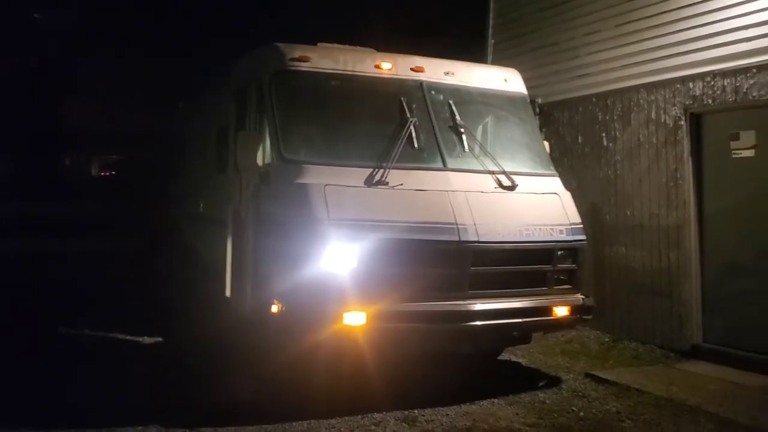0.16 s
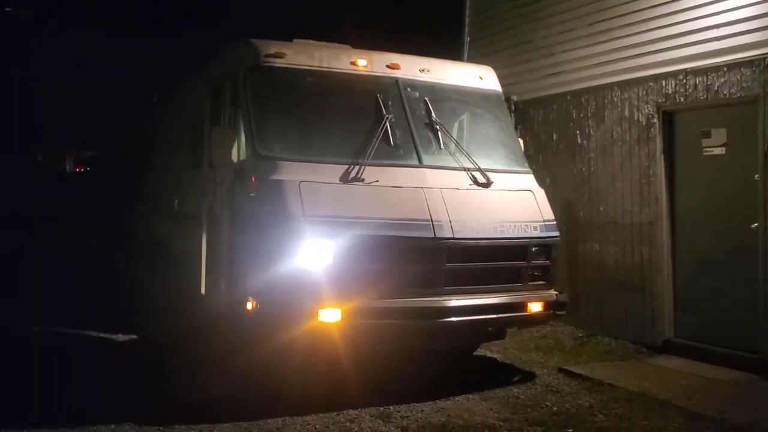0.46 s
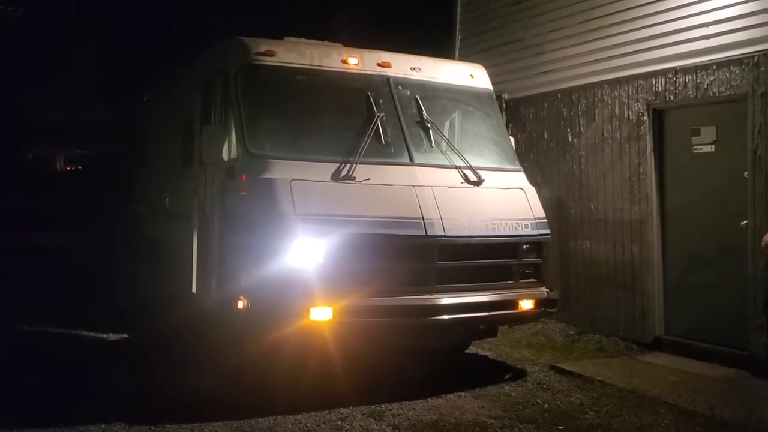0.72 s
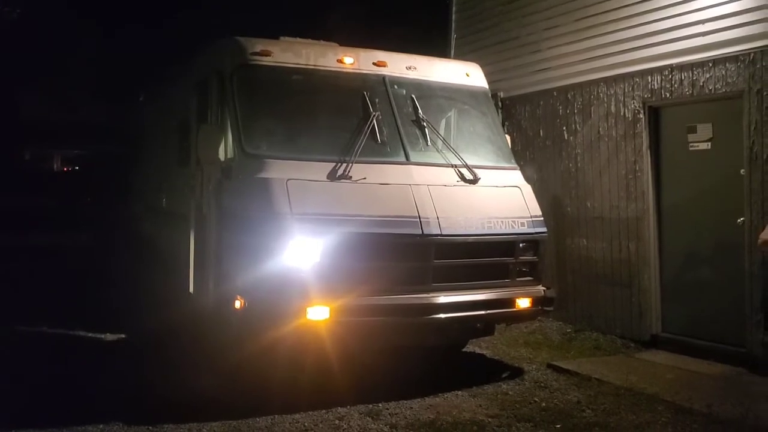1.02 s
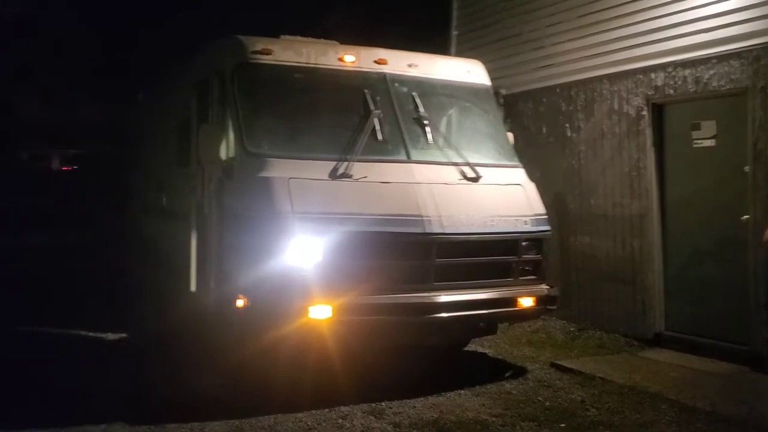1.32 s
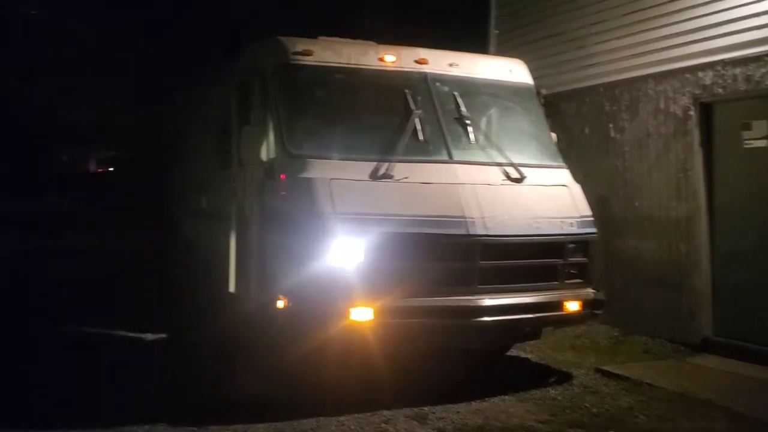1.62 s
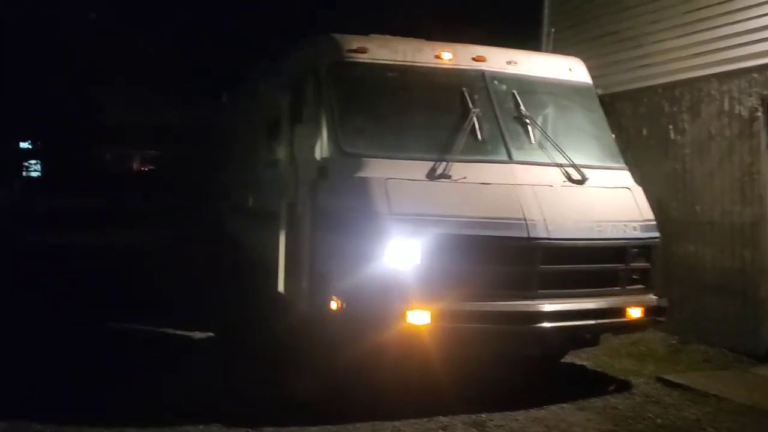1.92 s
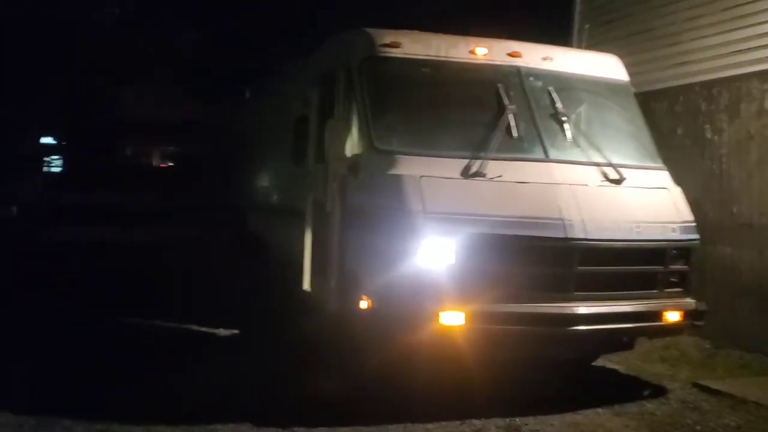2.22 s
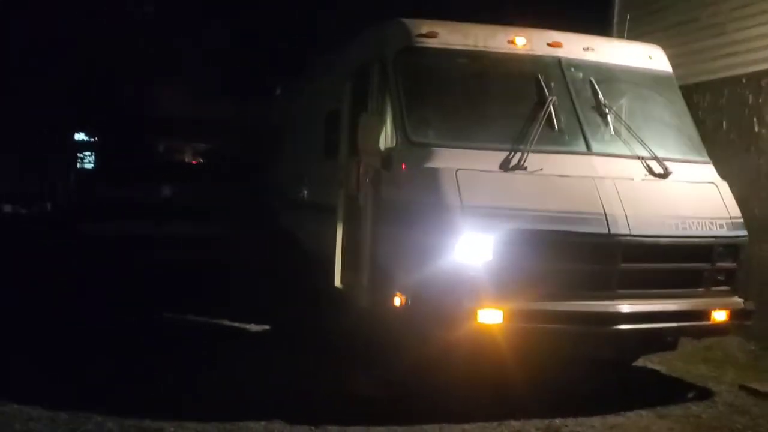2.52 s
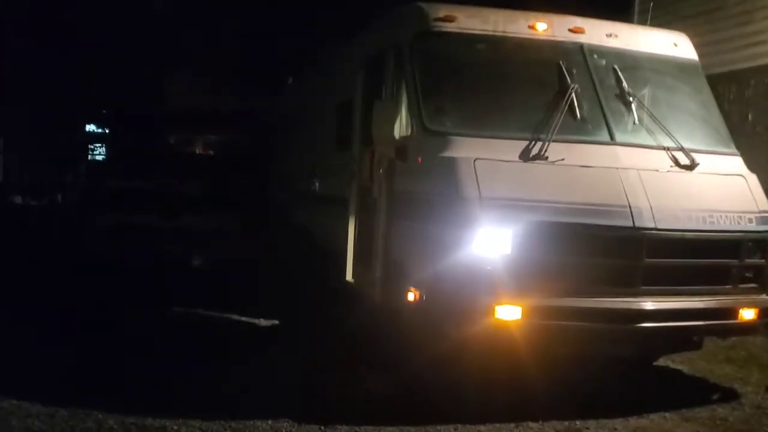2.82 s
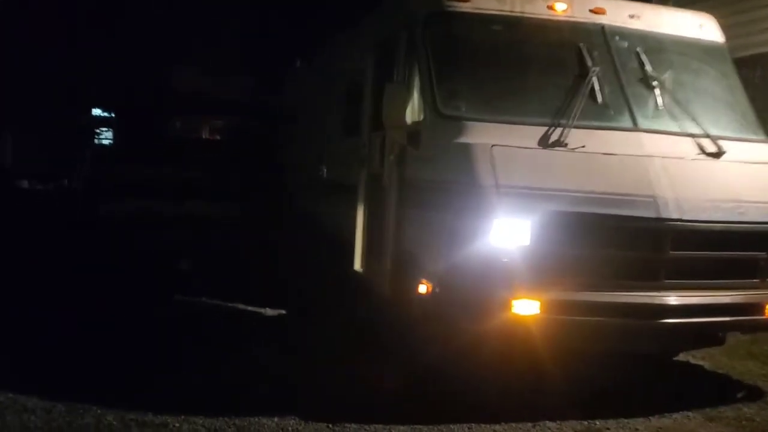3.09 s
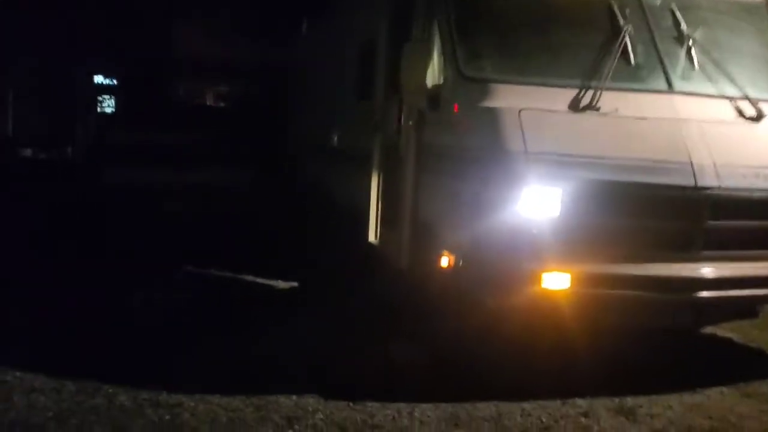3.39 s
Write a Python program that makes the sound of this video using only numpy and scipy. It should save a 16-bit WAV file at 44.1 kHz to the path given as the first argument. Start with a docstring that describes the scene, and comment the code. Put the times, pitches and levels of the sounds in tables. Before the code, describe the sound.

A motorhome engine idles fast with a deep steady boom, ticking valves and whirring fan.

```python
"""A motorhome's V8 runs at a fast idle beside a wall at night while the listener walks closer.
From the start the exhaust booms at the firing rate, the cylinders thump unevenly, and valve gear ticks and
clacks over the whirr of fan and belts, made of filtered noise; faint sine chinks come from loose metal.
A noise burst of grit clicks after a second and clearer rattles follow. Past two seconds grit scrapes, a stone
knocks three times as fading sines and the belt whistle grows; near the end grit clicks again."""
import sys
import numpy as np
from scipy import signal
from scipy.fft import rfft, irfft
from scipy.io import wavfile
from scipy.ndimage import uniform_filter1d, map_coordinates

SR = 44100
rng = np.random.default_rng(int(sys.argv[2]) if len(sys.argv) > 2 else 0)


def wav_record(signal):
    """Record a signal, one row per channel, as 16-bit PCM in the file named by sys.argv[1]."""
    frames = np.transpose(np.atleast_2d(signal))
    bounded = np.clip(frames, -1, 1)
    # unit amplitude maps onto the largest positive 16-bit level
    quanta = np.round(bounded * 32767).astype(np.int16)
    wavfile.write(sys.argv[1], SR, quanta)


N = 156555  # length in samples
T, HZ = np.arange(N) / SR, np.fft.rfftfreq(N, 1 / SR)


def amp(db):
    """Turns decibels into a plain gain."""
    return 10 ** (np.asarray(db) / 20)


def unit(x):
    """Scales to an average (rms) strength of 1."""
    return x / np.sqrt(np.mean(x ** 2) + 1e-20)


def curve(table, order=1):
    """Reads one column of a time table at every sample."""
    rows = np.array(table)
    return np.interp(T, rows[:, 0], rows[:, order])


def read(table, order=1):
    """Reads one column of a frequency table at every frequency of the spectrum."""
    rows = np.array(table)
    return np.interp(np.log(HZ + 1), np.log(rows[:, 0]), rows[:, order])


def peaks(modes):
    """Gain of a set of resonances: each lets through a band around its own pitch."""
    power = 0
    for hz, width, db in modes:
        detuning = (HZ ** 2 - hz ** 2) / (width * (HZ + 1))
        power = power + amp(db) ** 2 / (1 + detuning ** 2)
    return np.sqrt(power)


def colour(x, gain):
    """Filters with the given gain; nothing sounds before its cause (minimum phase)."""
    log_gain = np.log(np.maximum(gain, 1e-5))
    # folding the cepstrum onto positive times makes the filter causal
    cepstrum = irfft(log_gain, N) * (1 + np.sign(N / 2 - np.arange(N)))
    cepstrum[0] /= 2
    return irfft(rfft(x) * np.exp(rfft(cepstrum)), N)


def drift(hz):
    """Slow random wander of rms 1, with little movement faster than the given rate."""
    return unit(irfft(rfft(rng.standard_normal(N)) * np.exp(-(HZ / hz) ** 2), N))


# How alike left and right are. Each row: pitch in Hz, likeness from 0 to 1.
LIKENESS = [(60, 0.85), (120, 1), (240, 0.98), (480, 0.88), (950, 0.94), (1900, 0.5), (3800, 0.02),
            (16000, 0)]


def noise_pair():
    """White noise for left and right, alike in the bass and unrelated in the treble."""
    a, b = rfft(rng.standard_normal((2, N)))
    same = np.clip(read(LIKENESS), -1, 1)
    return irfft(np.array([a, same * a + np.sqrt(1 - same ** 2) * b]), N)


def burst(start, rise, decay):
    """Loudness shape with a straight rise and an exponential fall."""
    attack = np.clip((T - start) / rise, 0, 1)
    return attack * np.exp(-np.maximum(T - start - rise, 0) / decay)


def strikes(cycle, place, scatter_db, jitter_s):
    """One impulse in each engine cycle, a little uneven in time and strength."""
    turns = np.arange(np.ceil(cycle[-1])) + place
    turns = turns[turns < cycle[-1]]
    late, strong = rng.standard_normal((2, len(turns)))
    seconds = np.interp(turns, cycle, T) + jitter_s * late
    at = np.clip(seconds * SR, 0, N - 1).astype(int)
    return np.bincount(at, amp(scatter_db * strong), N)


# The idle. Each row: time in seconds, crank speed in rpm, level of the exhaust note in dB.
IDLE = [(0.0, 1061.6, -19.4), (0.3, 1035.6, -18.3), (0.7, 1020.6, -16.3), (1.1, 1068.6, -19.2),
        (1.45, 1056.2, -19.0), (1.85, 1042.6, -18.7), (2.15, 1032.2, -17.9), (2.4, 1039.6, -18.0),
        (2.65, 1067.6, -18.8), (3.0, 1056.8, -17.3), (3.3, 1032.6, -18.9), (3.55, 1029.0, -19.2)]
# Tones of the exhaust, as multiples of the engine cycle rate (8 is the firing rate).
EXHAUST_MULTIPLES = [5, 7, 8, 9, 11, 13, 16]
# One row for each multiple: level in dB relative to the exhaust note, waver as a share of the tone.
EXHAUST_TONES = [(-22.5, 0.67), (-36, 1), (0.06, 0.073), (-21.5, 0.49), (-13.5, 0.21), (-15, 0.24),
                 (-19.5, 0.22)]
# Firing slots of one cylinder bank, counted in eighths of a cycle.
BANK_SLOTS = [1, 3, 4, 6]
PIPE_LAG = .667  # in cycles


def exhaust(cycle):
    """The firing note, with side tones from the uneven firing slots of one cylinder bank."""
    out = np.zeros(N)
    for k, (db, waver) in zip(EXHAUST_MULTIPLES, EXHAUST_TONES):
        # the slots set where in the cycle each tone peaks
        bank = sum(np.exp(-2j * np.pi * k * slot / 8) for slot in BANK_SLOTS)
        tone = np.exp(1j * (2 * np.pi * k * (cycle - PIPE_LAG) + np.angle(bank)))
        wander = drift(hz=9) + 1j * drift(hz=4)
        out += amp(db) * (tone * (1 + waver * wander)).real
    return out * amp(curve(IDLE, order=2))


# Relative level of each cylinder's thump in dB.
THUMPS = [-1.8, -7.9, -3.7, -7.9, -8, -3.9, -8.4, -10.5]
# Place of each thump in the cycle, from 0 to 1.
THUMP_PLACES = [.984, .077, .226, .35, .494, .607, .732, .846]
# Sound of the hollow underbody. Each row: pitch in Hz, gain in dB.
UNDERBODY = [(40, -34.5), (138, -28.5), (168, -7), (195, 0), (225, .5), (255, -12), (310, -11.5),
             (400, -15.5), (520, -27.5), (800, -21.5), (1000, -37), (3000, -60)]
# Sound of the gas puffs. Each row: pitch in Hz, gain in dB.
PUFF = [(500, -28), (1200, -18), (2500, 6.5), (4000, 13.5), (6500, -12), (8500, -29), (16000, -29)]
THUMP_DB, THUMP_SCATTER_DB, THUMP_JITTER_S = -37.3, .8, .00012
PUFF_DB, PUFF_RISE_S, PUFF_DECAY_S = -53, 0.0037, 0.0046


def thumps(cycle):
    """Eight cylinders of unequal strength knock the hollow underbody and each let out a puff of gas."""
    blows = np.zeros(N)
    for place, db in zip(THUMP_PLACES, THUMPS):
        blows += amp(db) * strikes(cycle, place, THUMP_SCATTER_DB, THUMP_JITTER_S)
    body = unit(colour(blows, amp(read(UNDERBODY))))
    gate = signal.fftconvolve(blows, burst(0, PUFF_RISE_S, PUFF_DECAY_S))[:N]
    puffs = unit(colour(noise_pair() * gate, amp(read(PUFF))))
    return amp(THUMP_DB) * body + amp(PUFF_DB) * puffs


# Regular ticks. Each row: level in dB before the ringing, rise in seconds, decay in seconds.
TICKS = [(-48.5, 0.0057, 0.0056), (-52.5, .0025, .005), (-47.5, 0.0026, .004)]
# Place of each tick in the cycle, from 0 to 1.
TICK_PLACES = [.222, .848, .912]
# Ringing of the valve gear. Each row: pitch in Hz, width in Hz, gain in dB.
VALVE_MODES = [(3065, 56, 17), (4240, 300, 10), (5720, 360, 7.5), (6810, 180, 8.5), (7970, 120, 5),
               (8900, 130, 4.5), (9660, 200, 1), (10220, 320, 4.5), (11600, 160, 2), (12570, 220, 4),
               (13700, 250, 0), (15550, 500, 4.5)]
# Harder lifter clacks. Each row: start in seconds, level in dB before the ringing,
# pitch in Hz around which the ringing is driven hardest.
CLACKS = [(0.14, -41, 6870), (0.2547, -41, 6860), (0.4882, -46, 6600), (0.606, -38, 6720),
          (0.6837, -40, 6720), (0.7232, -36, 6870), (0.838, -38.5, 6600), (0.9526, -49, 6830),
          (1.029, -44, 10100), (1.2944, -51, 6890), (1.5168, -37.5, 15700), (1.6331, -39, 6900),
          (1.7473, -36, 6630), (1.941, -40, 10300), (2.2098, -39, 6880), (2.327, -36, 6860),
          (2.4058, -38, 12500), (2.4403, -40, 6760), (2.8927, -35, 6770), (3.0071, -35.5, 6760),
          (3.2379, -35, 6790), (3.3542, -37, 6960)]
TICK_SCATTER_DB, TICK_JITTER_S, TICK_TAIL_DB, TICK_TAIL_S = 4, .0004, -6.5, 0.022
CLACK_RISE_S, CLACK_DECAY_S, CLACK_FOCUS_HZ, CLACK_OTHERS_DB = 0.0023, 0.0068, 500, -5.5
RING_VARY_DB = 3.5


def tick_shape(rise, decay):
    """Loudness shape of a tick with its longer, weaker tail from the engine bay."""
    tail = amp(TICK_TAIL_DB) * burst(0, rise, TICK_TAIL_S)
    return np.hypot(burst(0, rise, decay), tail)[:SR // 4]


def valves(cycle):
    """Rasping ticks ring the valve gear in changing blends of modes; now and then a lifter clacks harder."""
    gate = np.zeros(N)
    for place, (db, rise, decay) in zip(TICK_PLACES, TICKS):
        hits = strikes(cycle, place, TICK_SCATTER_DB, TICK_JITTER_S)
        gate += amp(db) * signal.oaconvolve(hits, tick_shape(rise, decay))[:N]
    start, clack_db, clack_hz = np.transpose(CLACKS)
    clack_at = (start * SR).astype(int)
    clack = tick_shape(CLACK_RISE_S, CLACK_DECAY_S)
    out = np.zeros((2, N))
    for hz, width, db in VALVE_MODES:
        # modes far from a clack's own pitch get less of it
        apart = 1 - np.exp(-((hz - clack_hz) / CLACK_FOCUS_HZ) ** 2)
        hits = np.bincount(clack_at, amp(clack_db + CLACK_OTHERS_DB * apart), N)
        hard = signal.oaconvolve(hits, clack)[:N]
        ring = irfft(rfft(rng.standard_normal((2, N))) * peaks([(hz, width, db)]), N)
        out += ring * np.hypot(gate * amp(RING_VARY_DB * drift(hz=6.3)), hard)
    return out


# Fan, belts and block from afar. Each row: pitch in Hz, relative level in dB per Hz.
WHIRR_FAR = [(20, -14), (40, -20), (70, 11), (120, 5.5), (200, 8), (290, 2.5), (380, 4.5), (500, -10),
             (620, 1.5), (720, 0.5), (830, 3.5), (970, -8), (1150, -7), (1550, -4), (2000, -7),
             (2380, -3.5), (2750, -12), (3800, -14.5), (4800, -13), (6700, -15), (8200, -29), (12000, -29),
             (16000, -28)]
# The same from nearer. Each row: pitch in Hz, relative level in dB per Hz.
WHIRR_NEAR = [(20, -5), (40, 0), (70, 14), (120, 12), (200, 9), (290, 6), (400, -3.5), (480, -3.5),
              (620, 3), (820, 0.5), (990, -6), (1150, -8), (1400, -5), (2250, -4.5), (2700, -6),
              (3800, -12), (4500, -17), (5200, -23), (6700, -22), (8200, -23), (12000, -29.5), (16000, -32)]
# The walk. Each row: time in seconds, nearness from 0 to 1, level of the whirr in dB.
APPROACH = [(0, 0.22, -35), (1.1, 0.13, -33.5), (1.8, 0.44, -32.5), (2.4, 0.8, -31.5), (3.0, 0.96, -30.5),
            (3.55, 0.68, -31)]
# Balance. Each row: pitch in Hz, left minus right in dB from afar, the same from nearer.
TILT = [(99, 3.5, 0), (400, -2.5, 1), (595, 0.5, -3.5), (955, -2.5, 3.5), (1770, 0.5, -3), (2410, 0.5, 4),
        (3200, 13, -2.5), (4140, 8.5, 1.5), (5470, -2, 4.5), (7500, -1, -5.5), (9300, 6, -4),
        (15000, -4, -5)]
# Belt whistle. Each row: time in seconds, level in dB.
BELT = [(0, -55), (.8, -75), (2, -51), (2.4, -55), (2.6, -45.5), (3.05, -45), (3.5, -53)]
BELT_HZ, BELT_WIDTH_HZ = 2405, 60
THROB, PATCHY_DB = 0.035, 1.27  # throb is a share of the whirr


def whirr(cycle):
    """Fan and block noise throbs with the firings and fills out on approach, with a thin belt whistle."""
    near = np.clip(curve(APPROACH), 0, 1)
    # small patches of time and pitch flicker in level
    z = signal.stft(noise_pair(), nperseg=512)[2]
    patches = uniform_filter1d(rng.standard_normal(z.shape[1:]), size=7, axis=0)
    patches = unit(uniform_filter1d(patches, size=5, axis=1))
    air = signal.istft(z * amp(PATCHY_DB * patches), nperseg=512)[1][:, :N]
    air = air * (1 + THROB * np.cos(2 * np.pi * 8 * cycle))  # eight firings a cycle
    sides = np.array([[.5], [-.5]])  # half the tilt to each side
    far_gain = amp(read(WHIRR_FAR) + sides * read(TILT, order=1))
    near_gain = amp(read(WHIRR_NEAR) + sides * read(TILT, order=2))
    far = unit(irfft(rfft(air) * far_gain, N))
    close = unit(irfft(rfft(air) * near_gain, N))
    belt = unit(colour(noise_pair(), peaks([(BELT_HZ, BELT_WIDTH_HZ, 0)]) ** 1.5))
    fan = amp(curve(APPROACH, order=2)) * ((1 - near) * far + near * close)
    return fan + belt * amp(curve(BELT))


RIPPLE_DB, RIPPLE_FROM_HZ = .9, 4500  # weaker below this pitch


def ripple():
    """Fine fixed peaks and dips that reflections from wall and ground leave in a spectrum."""
    fine = rng.standard_normal(len(HZ))
    fine = uniform_filter1d(uniform_filter1d(fine, size=160), size=160)
    return amp(RIPPLE_DB * unit(fine) * HZ / np.hypot(HZ, RIPPLE_FROM_HZ))


# Clear rattles of loose metal. Each row: start in seconds, level in dB, pitch in Hz.
RATTLES = [(1.685, -38, 2050), (2.095, -45, 5900), (2.253, -40, 3100), (2.324, -41, 4400),
           (2.347, -50, 11000), (2.369, -40, 4450), (2.406, -44, 12500), (2.528, -44, 4600),
           (2.553, -39, 3050), (2.597, -43, 4600), (2.663, -39, 3100), (2.711, -42, 4550),
           (2.982, -39, 3000)]
RATTLE_RISE_S, RATTLE_DECAY_S = .002, .007
CHINKS_PER_S, CHINK_LOW_HZ, CHINK_HIGH_HZ = 90, 1200, 6500
CHINK_DB, CHINK_SPREAD_DB, CHINK_DB_PER_OCTAVE = -46, 3, -5.5  # base level is at the lowest pitch


def rattles():
    """Loose metal parts ring briefly: a few clear rattles among many faint chinks."""
    when, pitch, strong = rng.random((int(CHINKS_PER_S * N / SR), 3)).T
    octaves = pitch * np.log2(CHINK_HIGH_HZ / CHINK_LOW_HZ)
    extra_db = CHINK_SPREAD_DB * np.minimum(-np.log(1 - strong), 2)
    chink_db = CHINK_DB + CHINK_DB_PER_OCTAVE * octaves + extra_db
    chinks = list(zip(when * T[-1], chink_db, CHINK_LOW_HZ * 2 ** octaves))
    fade = burst(0, RATTLE_RISE_S, RATTLE_DECAY_S)[:SR // 10]
    length = len(fade)
    out = np.zeros((2, N + SR))
    for start, db, hz in list(RATTLES) + chinks:
        phases = rng.random() + rng.random((2, 1)) / 2  # in turns, one for each side
        at = int(start * SR)
        out[:, at:at + length] += amp(db) * fade * np.sin(2 * np.pi * (hz * T[:length] + phases))
    return out[:, :N]


# Grit on the ground. Each row: start in seconds, level in dB, rise in seconds, decay in seconds,
# brightness in dB (the treble lift for each tenfold step of 1 + pitch in kHz).
GRIT = [(1.1365, -35, .0003, .001, 20), (2.2925, -39, .001, .004, 24), (2.2935, -30, .005, .004, -14),
        (3.3045, -34, .0003, .0012, 20)]
# Ringing of the grit. Each row: pitch in Hz, width in Hz, gain in dB.
GRIT_MODES = [(1060, 120, 5), (3000, 420, -1), (3900, 500, -9)]


def grit():
    """Small stones click and scrape: short noise bursts pass through the stones' resonances."""
    out = np.zeros((2, N))
    for start, db, rise, decay, bright_db in GRIT:
        bright = amp(bright_db * np.log10(1 + HZ / 1000))
        gain = unit(peaks(GRIT_MODES) * bright)
        out += amp(db) * colour(noise_pair() * burst(start, rise, decay), gain)
    return out


# Knocks of the stone. Each row: start in seconds, level in dB.
KNOCKS = [(2.2942, -27.5), (2.298, -25), (2.3008, -23)]
# Ringing of the stone. Each row: pitch in Hz, relative level in dB, decay in seconds.
KNOCK_MODES = [(1070, -6, .0028), (2990, 0, .0018), (2600, -7, .001), (3500, -8, .001), (4150, -8, .0014)]
KNOCK_RISE_S = .0004


def knocks():
    """A stone rocks on the ground: three quick, hollow knocks, each a set of fading sines."""
    out = np.zeros(N)
    for start, db in KNOCKS:
        for hz, mode_db, decay in KNOCK_MODES:
            ring = np.sin(2 * np.pi * hz * (T - start))
            out += amp(db + mode_db) * burst(start, KNOCK_RISE_S, decay) * ring
    return out


# The listener turns. Each row: time in seconds, lag of the left side in seconds.
TURN = [(0, -.00005), (1.1, -.00009), (2.0, 0), (2.5, .00005), (3.55, .00009)]
LEFT_DB = -0.03


def scene():
    """One crank speed drives every engine layer; the image shifts as the listener turns."""
    cycle = np.cumsum(curve(IDLE)) / (120 * SR)  # a cycle is two turns of the crank
    clatter = colour(valves(cycle) + whirr(cycle), ripple())
    engine = exhaust(cycle) + thumps(cycle) + clatter
    left, right = engine + rattles() + grit() + knocks()
    left = map_coordinates(left, [(T - curve(TURN)) * SR], order=5, mode="nearest")
    return np.array([left * amp(LEFT_DB), right])


EDGE_HZ = 15900


def record(dry):
    """A steep low-pass filter removes the highest treble."""
    low_pass = signal.firwin(1023, EDGE_HZ, window=("kaiser", 9), fs=SR)
    return signal.oaconvolve(dry, low_pass[None], "same")


dry = scene()
out = record(dry)
wav_record(out)
```